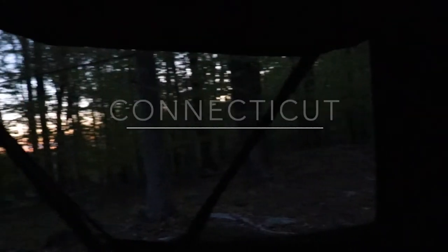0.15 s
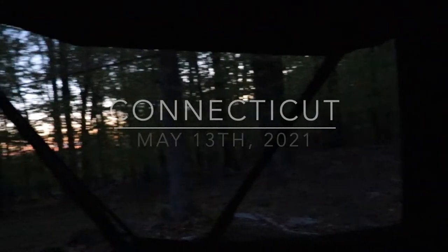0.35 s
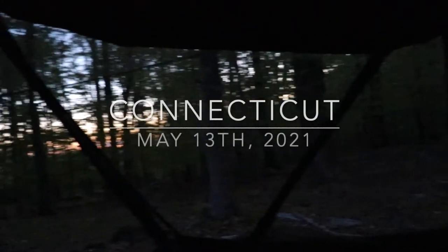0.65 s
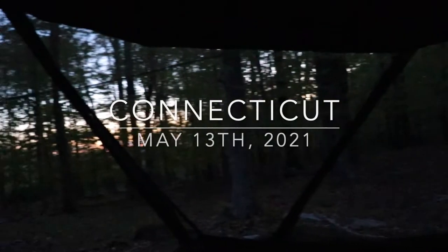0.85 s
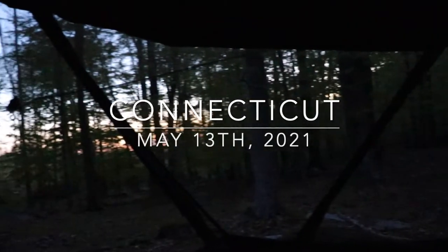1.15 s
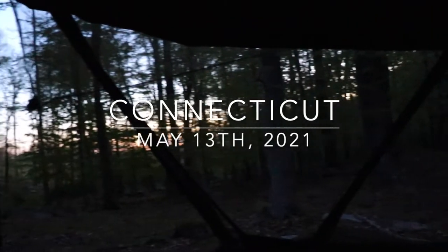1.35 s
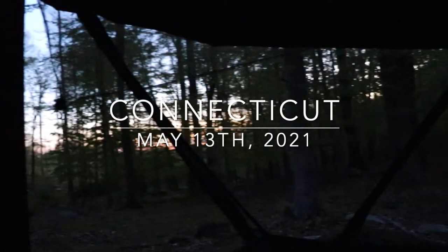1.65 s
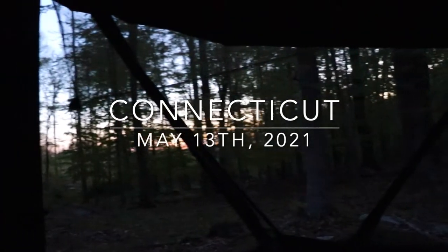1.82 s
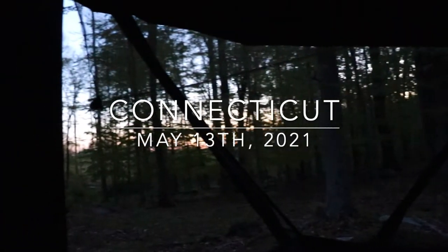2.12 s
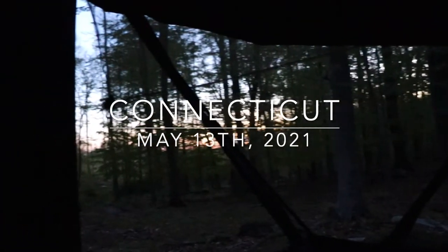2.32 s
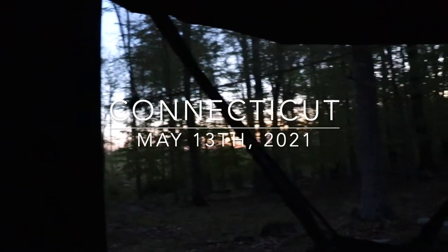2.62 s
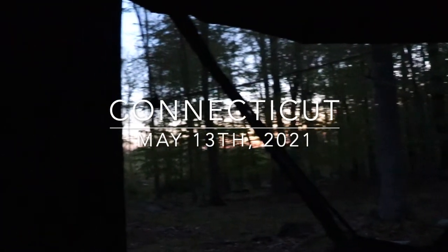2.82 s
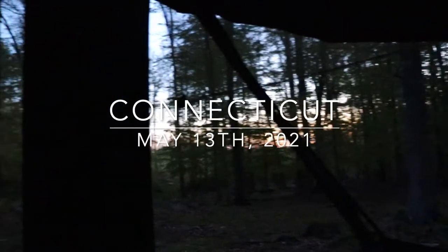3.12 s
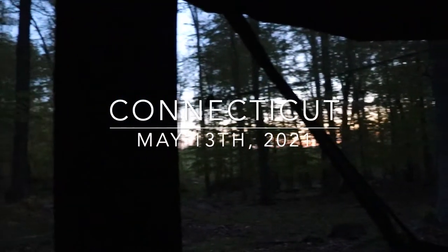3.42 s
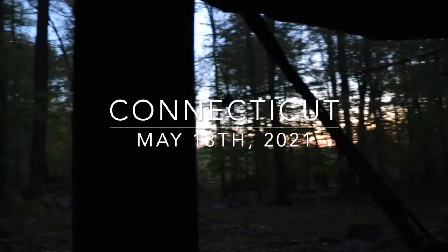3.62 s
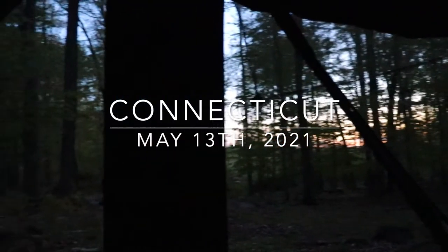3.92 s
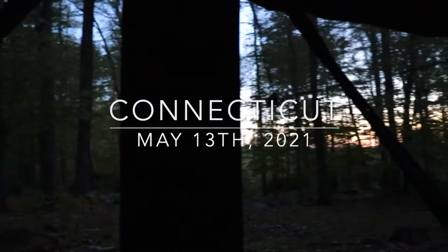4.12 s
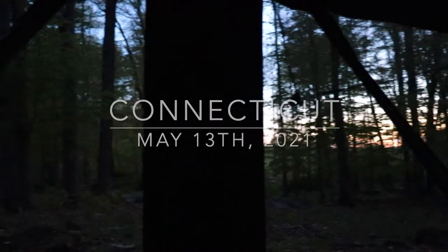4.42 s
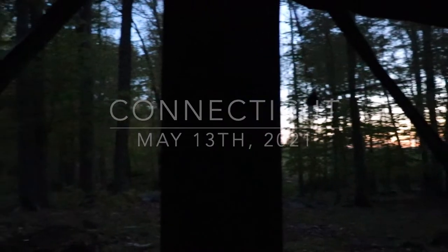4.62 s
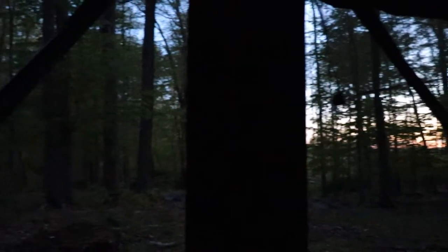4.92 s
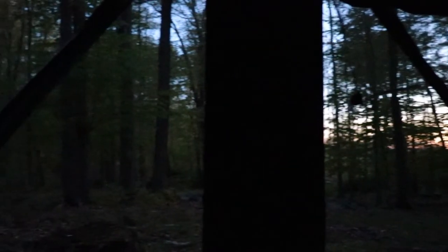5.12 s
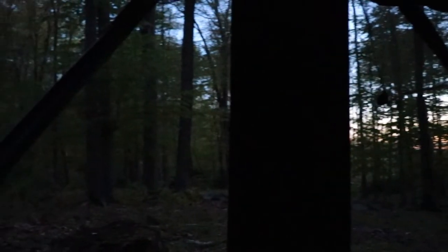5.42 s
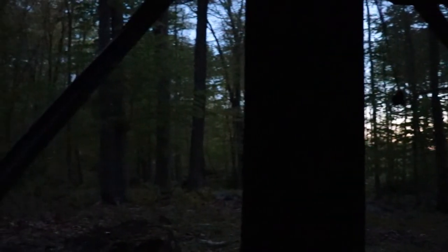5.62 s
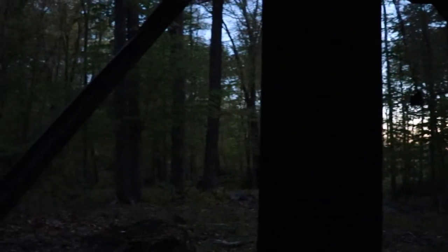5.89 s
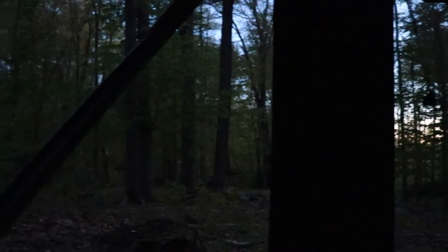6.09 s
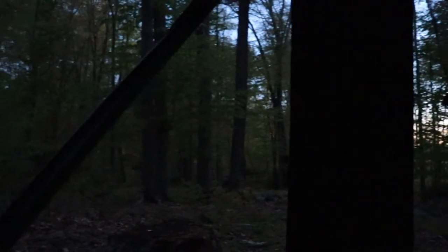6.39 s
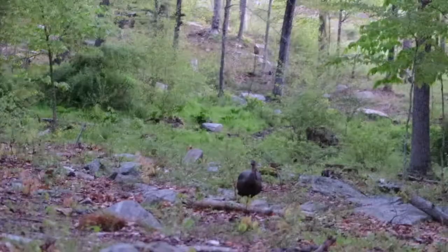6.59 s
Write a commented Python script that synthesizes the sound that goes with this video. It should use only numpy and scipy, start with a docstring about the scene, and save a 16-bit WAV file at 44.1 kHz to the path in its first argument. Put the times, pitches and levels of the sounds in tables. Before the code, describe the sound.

Quiet forest dawn chorus with short chirps, buzzes and echoes; someone shifts close by with rustling, small ticks, dull bumps and a single sharp click.

```python
"""A still wood at dawn: songbirds whistle, slur and buzz as gliding near-sines,
and the trunks scatter each note into a short tail of noise echoes.
Under them lie a hiss, a far drone and a faint low rumble, all coloured noise.
Someone turning nearby rustles and scuffs in bursts of noise, with small ticks and dull bumps.
Something snaps once close by, probably a twig: a run of cracks into resonances. Practically mono."""
import sys
import numpy as np
from scipy import signal
from scipy.fft import rfft, irfft
from scipy.io import wavfile
from scipy.ndimage import uniform_filter1d

SR = 44100
rng = np.random.default_rng(int(sys.argv[2]) if len(sys.argv) > 2 else 0)


def int16_out(signal):
    """Quantize to a 16-bit WAV file."""
    q = np.round(np.clip(np.atleast_2d(signal).T, -1, 1) * 32767)
    wavfile.write(sys.argv[1], SR, q.astype(np.int16))


N = 297675
TIME = np.arange(N) / SR


def undb(db):
    """Decibels to amplitude gain."""
    return 10 ** (np.asarray(db) / 20)


def unit(x):
    """Scale to rms 1."""
    return x / np.sqrt(np.mean(x ** 2))


def curve(rows):
    """Join (start_s, level_db) points by straight lines in time."""
    start_s, level_db = np.transpose(rows)
    return np.interp(TIME, start_s, level_db)


def add(out, start_s, x):
    """Mix a sound in at start_s."""
    i = max(0, int(start_s * SR))
    out[i:i + len(x)] += x[:max(0, N - i)]


def colour(x, spectrum):
    """Filter by (hz, density_db) points on a log frequency axis; white noise keeps its level."""
    hz, density_db = np.transpose(spectrum)
    f = np.fft.rfftfreq(len(x), 1 / SR)
    gain = unit(undb(np.interp(np.log(f + 1), np.log(hz), density_db)))
    return irfft(rfft(x) * gain, len(x))


def noise(spectrum):
    """Coloured noise of rms 1."""
    return unit(colour(rng.standard_normal(N), spectrum))


def resonate(x, hz, width_hz):
    """One resonance, gain 1 at the centre."""
    b, a = signal.iirpeak(hz, hz / width_hz, fs=SR)
    return signal.lfilter(b, a, x)


def walk(rate_hz):
    """Smoothed random steps, rate_hz per second, spread near 1."""
    k = int(SR / rate_hz)
    steps = np.repeat(rng.standard_normal(N // k + 1), k)
    return 1.194 * uniform_filter1d(steps, k)[:N]


# hiss spectrum: hz [Hz], density_db [dB per Hz, relative]
AIR_SPECTRUM = [(45, 9), (120, 2.5), (220, 2), (350, -0.5), (700, 1.5), (1100, -2.5), (1700, -3.5),
                (2700, -3.5), (3800, -10), (6000, -13), (15500, -17.5)]


def air():
    """Hiss of the air: broadband noise whose level wanders slightly."""
    return noise(AIR_SPECTRUM) * undb(-51.0 + 0.48 * walk(2.8))


# drone spectrum: hz [Hz], density_db [dB per Hz, relative]
DRONE_SPECTRUM = [(35, -12), (50, 4.5), (62, 3), (85, -7.5), (118, -2), (132, -4), (150, -3), (200, -12),
                  (300, -18), (700, -41.5)]
# drone level: start_s [s], level_db [dB rms]
DRONE_LEVEL = [(0, -51.5), (1.3, -55.5), (2.7, -52.5), (4, -54), (4.5, -59), (5.1, -56.5), (5.8, -61),
               (6.3, -56), (6.75, -49.5)]


def drone():
    """Far-off drone, probably traffic: low noise that rises and falls."""
    return noise(DRONE_SPECTRUM) * undb(curve(DRONE_LEVEL))


# rumble spectrum: hz [Hz], density_db [dB per Hz, relative]
RUMBLE_SPECTRUM = [(8, -16), (20, -11), (26, -1.5), (29, 0.5), (35, -12.5), (45, -25), (90, -48.5),
                   (300, -82)]
# rumble level: start_s [s], level_db [dB rms]
RUMBLE_LEVEL = [(0, -46), (.55, -50), (1.5, -49), (1.75, -45), (2.2, -45.5), (3.4, -46.5), (3.68, -39.5),
                (3.87, -48), (4.1, -41.5), (4.32, -50.5), (5.1, -41), (5.85, -42.5), (5.98, -57),
                (6.11, -43.5), (6.55, -47), (6.7, -38)]


def rumble():
    """Heaving rumble: very low noise, levelled over 1/8 s so that it follows the table."""
    rough = noise(RUMBLE_SPECTRUM)
    level = rough / np.sqrt(uniform_filter1d(rough ** 2, size=SR // 8))
    return level * undb(curve(RUMBLE_LEVEL))


def background():
    """Hiss, drone and rumble together."""
    return air() + drone() + rumble()


SETTLE, SWOOP_TOP = .27, .78  # shares of note length: a scoop settles, a swoop turns over
# bird gestures by name: progress from first to second pitch for u in 0..1, loudest [share of length]
GESTURES = {"slur": (lambda u: u, 0.45), "scoop": (lambda u: 1 - np.exp(-u / SETTLE), 0.65),
            "arch": (lambda u: np.sin(np.pi * u), 0.55),
            "lean": (lambda u: np.interp(u, [0, .2, .45, .78, 1], [0.021, .65, .97, 1, 0.26]), 0.8),
            "swoop": (lambda u: np.interp(u, [0, SWOOP_TOP / 2, SWOOP_TOP, 1], [0, .3, 1, -.25]), 0.93)}


def sing(notes, flutter_hz, flutter, waver, overtone_db, flicker_db):
    """Each note is a near sine that follows its gesture between two pitches while it swells and fades."""
    out = np.zeros(N)
    tremor = np.sin(2 * np.pi * np.cumsum(flutter_hz * (1 + 0.0994 * walk(30))) / SR)
    bend = 1 + flutter * tremor + waver * walk(180)
    for start_s, length_s, gesture, first_hz, second_hz, level_db in notes:
        u = np.linspace(0, 1, int(length_s * SR))
        contour, loudest = GESTURES[gesture]
        glide_hz = first_hz + (second_hz - first_hz) * contour(u)
        pitch_hz = glide_hz * np.interp(start_s + u * length_s, TIME, bend)
        phase = 2 * np.pi * np.cumsum(pitch_hz) / SR
        swell = np.abs(np.sin(np.pi * np.interp(u, [0, loudest, 1], [0, .5, 1]))) ** .75
        tone = np.sin(phase) + undb(overtone_db) * np.sin(2 * phase)
        add(out, start_s, undb(level_db) * swell * tone)
    # paths through the foliage interfere, so a gliding note flickers
    return out * undb(flicker_db * walk(140))


def wood(x, t60_s, early_db, early_s):
    """Trunks throw back a quick cluster of echoes, then the whole wood answers in a diffuse tail."""
    t = TIME[:2 * SR]
    hits = rng.random(len(t)) < 600 / SR  # 600 echoes per second
    trunks = rng.standard_normal(len(t)) * hits * np.exp(-t / early_s)
    decay = np.exp(-np.log(1000) * t / t60_s)
    tail = rng.standard_normal(len(t)) * decay * (1 - np.exp(-t / 0.007))
    response = (unit(tail) + undb(early_db) * unit(trunks)) / np.sqrt(len(t))
    return signal.fftconvolve(x, response)[:N]


def distant_song(per_s, low_hz, high_hz, length_s, slide):
    """Many faint slurs at random times and pitches."""
    count = int(per_s * N / SR)
    when, pitch, long, glide, loud = rng.random((count, 5)).T
    first_hz = low_hz * (high_hz / low_hz) ** pitch
    second_hz = first_hz * (1 + slide * (glide - .5))
    notes = zip(when * N / SR, length_s * (.5 + long), ["slur"] * count, first_hz, second_hz, -7 * loud)
    return sing(notes, flutter_hz=54.63, flutter=0.01, waver=0.0095, overtone_db=-42, flicker_db=3.0)


# wash spectrum: hz [Hz], density_db [dB per Hz, relative]
CHORUS_SPECTRUM = [(1200, -40), (1900, -13), (2300, -2), (2800, -3.5), (3400, -5), (4000, -6), (4600, -6),
                   (5400, -11), (7000, -31)]
# wash level before the mix gain: start_s [s], level_db [dB]
CHORUS_LEVEL = [(0, -56), (.6, -60), (1.2, -57), (1.8, -56), (2.4, -64), (3, -56), (3.5, -50.5), (4.2, -62),
                (4.7, -61), (5.3, -55.5), (6.75, -52.5)]


def chorus_wash():
    """Distant birds blur into a wash: random slurs, scattered by the wood and coloured."""
    song = distant_song(per_s=100, low_hz=1847, high_hz=5467, length_s=.07, slide=.3)
    crowd = wood(song, t60_s=1.3, early_db=0.0, early_s=0.021)
    return unit(colour(crowd, CHORUS_SPECTRUM)) * undb(curve(CHORUS_LEVEL) - 1.5)


FAR_RISE = 0.0865  # upward slide, share of pitch
# notes from deep in the wood: start_s [s], length_s [s], pitch_hz [Hz], level_db [dB before mix gain]
FAR_WHISTLES = [(0, 0.05, 4040, -53), (.484, 0.048, 2790, -50), (0.859, 0.075, 4560, -52),
                (.889, 0.044, 2300, -56), (0.98, .11, 2620, -58), (1.1, .125, 2307, -54),
                (1.127, 0.064, 4620, -51.5), (1.255, .1, 4740, -58), (1.318, .045, 2000, -54),
                (1.356, .11, 2290, -52), (1.396, .062, 4600, -58.5), (2.416, .14, 6560, -51),
                (3.927, .033, 2720, -51), (5.272, .069, 4410, -52), (5.36, .082, 2880, -62),
                (6.17, .07, 3750, -55), (6.491, 0.13, 3960, -53)]


def far_whistles():
    """Far singers: near-sines that all slide up through their pitch."""
    rising = []
    for start_s, length_s, pitch_hz, level_db in FAR_WHISTLES:
        first_hz, second_hz = pitch_hz * (1 - FAR_RISE / 2), pitch_hz * (1 + FAR_RISE / 2)
        rising.append((start_s, length_s, "slur", first_hz, second_hz, level_db))
    return sing(rising, flutter_hz=60, flutter=0.009, waver=0.0069, overtone_db=-40, flicker_db=3.0)


# fluttered notes: start_s [s], length_s [s], gesture, first_hz [Hz], second_hz [Hz],
# level_db [dB before mix gain]
BUZZES = [(.02, .16, "slur", 4900, 4750, -58.5), (.195, .079, "arch", 3900, 4070, -54.5),
          (.84, .14, "slur", 4700, 4600, -57), (1.694, .058, "scoop", 2730, 2850, -50),
          (1.9, .29, "slur", 2870, 2755, -51.5), (2.88, .06, "slur", 5470, 5860, -44.5),
          (3.595, .074, "slur", 3650, 2944, -46.5), (3.615, .11, "scoop", 6900, 5630, -47),
          (3.72, .074, "slur", 5050, 4480, -53), (4.925, .025, "slur", 2700, 3820, -49),
          (4.992, 0.035, "slur", 2600, 4300, -49.5), (4.995, .035, "slur", 5400, 5800, -54),
          (5.086, .05, "slur", 5200, 4600, -50), (5.432, .032, "slur", 4750, 4300, -52),
          (5.94, .044, "slur", 4800, 4100, -49), (6.02, .115, "slur", 1142, 1210, -53),
          (6.39, .062, "arch", 5150, 5700, -57), (6.42, .069, "slur", 4600, 4440, -51),
          (6.627, 0.051, "slur", 2800, 3006, -39), (6.665, .09, "slur", 3050, 2680, -45.5)]


def buzzes():
    """Buzzing notes: a fast, wide pitch flutter roughens the tone."""
    return sing(BUZZES, flutter_hz=85, flutter=0.045, waver=0.0156, overtone_db=-32, flicker_db=2.5)


# clear nearer notes: start_s [s], length_s [s], gesture, first_hz [Hz], second_hz [Hz],
# level_db [dB before mix gain]
WHISTLES = [(.052, .042, "slur", 2790, 2510, -44.5), (.106, 0.041, "scoop", 3430, 2920, -40),
            (.695, 0.059, "slur", 3660, 3360, -50.5), (.814, 0.061, "slur", 5200, 4500, -52),
            (1.493, .024, "slur", 3280, 3920, -48), (1.515, .07, "slur", 3680, 2895, -42.5),
            (1.642, 0.041, "arch", 2560, 2623, -42.5), (1.766, 0.031, "scoop", 2560, 2760, -46),
            (1.865, .06, "slur", 2926, 2820, -43.5), (1.92, .078, "slur", 2760, 2885, -45),
            (1.981, 0.095, "scoop", 2850, 2593, -47), (2.305, 0.12, "slur", 6880, 6260, -47),
            (2.588, 0.068, "scoop", 5500, 4320, -44.5), (2.636, .072, "scoop", 4320, 4160, -36.5),
            (3.895, .035, "arch", 1790, 2030, -48.5), (4.408, 0.036, "arch", 1770, 2020, -51.5),
            (4.575, 0.1, "slur", 2323, 1760, -45), (4.65, 0.07, "slur", 3520, 2580, -52),
            (4.712, .085, "slur", 2596, 2648, -45), (4.817, .045, "slur", 4260, 3200, -54),
            (4.896, .05, "slur", 4450, 3350, -52), (4.91, .04, "slur", 2140, 3650, -49),
            (4.911, 0.039, "scoop", 4980, 5470, -43.5), (5.02, 0.036, "slur", 4030, 4380, -48),
            (5.095, .025, "scoop", 2350, 3146, -46), (5.232, .05, "slur", 2620, 2590, -49),
            (5.3, .052, "slur", 3570, 3710, -47), (5.351, 0.036, "arch", 1685, 2010, -45.5),
            (5.39, .047, "slur", 6040, 5000, -59), (5.621, 0.033, "slur", 4100, 4850, -53),
            (5.755, .04, "scoop", 4700, 3980, -48.5), (5.8, 0.049, "scoop", 4040, 4660, -50),
            (5.892, .031, "scoop", 5200, 5800, -55), (5.945, .138, "swoop", 1853, 3120, -43),
            (6.12, .12, "scoop", 1400, 1960, -44.5), (6.128, .025, "scoop", 4000, 4610, -50),
            (6.264, 0.026, "slur", 4350, 4090, -47.5), (6.304, 0.052, "slur", 4720, 4380, -40),
            (6.335, .07, "slur", 4300, 4160, -43), (6.369, 0.029, "scoop", 1910, 1720, -49),
            (6.485, .033, "slur", 4300, 2900, -50), (6.513, 0.076, "slur", 2720, 2700, -48.5)]


def whistles():
    """Clear notes of the nearer birds: almost pure tones with slight flutter."""
    return sing(WHISTLES, flutter_hz=90.8, flutter=0.0055, waver=0.003, overtone_db=-35, flicker_db=2.0)


PHRASE_HZ, PHRASE_RISE_HZ = 3000, 402  # pitch the phrase leans on and the climb to it
CHIP_GAP_S, CHIP_DB = .052, -45.5
# one singer's repeated phrase: start_s [s], length_s [s], level_db [dB before mix gain]
PHRASES = [(4.078, .082, -37.5), (5.533, .099, -39.5)]


def phrases():
    """The repeated phrase: climb to the pitch, lean on it, let go, drop in a quick chip with a strong overtone."""
    notes = []
    for start_s, length_s, level_db in PHRASES:
        chip_s = start_s + length_s + CHIP_GAP_S
        notes += [(start_s, length_s, "lean", PHRASE_HZ - PHRASE_RISE_HZ, PHRASE_HZ, level_db),
                  (chip_s, .023, "slur", 3850, 2550, CHIP_DB),
                  (chip_s + 0.0079, .012, "slur", 7000, 4400, CHIP_DB + 0.5)]
    return sing(notes, flutter_hz=91, flutter=.003, waver=0.0042, overtone_db=-17.0, flicker_db=1.8)


def birds():
    """Near and far singers in one wood, over the wash of the rest."""
    wash, far, buzz = chorus_wash(), far_whistles(), buzzes()
    near = whistles() + phrases()
    # the further the singer, the larger the share that arrives by way of the trunks
    sent = undb(-6.5) * near + undb(-5.0) * buzz + undb(-3.5) * far
    echoes = wood(sent, t60_s=1.0, early_db=-2.5, early_s=0.016)
    direct = undb(-1.24) * near + undb(-1.5) * buzz + undb(-2.0) * far
    return direct + echoes + wash


def catches(per_s, size_db, spread_db, decay_s):
    """Threads catch and let go at random: each lifts the level at once and dies away."""
    kicks = (rng.random(N) < per_s / SR) * undb(size_db + spread_db * rng.random(N))
    lift = signal.lfilter([1], [1, -np.exp(-1 / (decay_s * SR))], kicks)
    return unit(1 + lift)


RUSTLE_ATTACK_S, RUSTLE_RELEASE_S = 0.044, 0.053
RESTING_SCUFF_DB = -64  # the cloth is never quite still
# cloth spectra: hz [Hz], density_db [dB per Hz, relative]
SWISH_SPECTRUM = [(300, -26), (1500, -5), (3200, -4.5), (4500, 0.5), (6000, 0), (8000, -3), (10000, -8.5),
                  (12500, -8.5), (15500, -21)]
SCUFF_SPECTRUM = [(100, -4), (300, -1.5), (700, 1.5), (1150, 3), (1600, -4.5), (2500, -12), (4000, -7),
                  (8000, -33)]
# strokes as the body turns: start_s [s], length_s [s], swish_db [dB], scuff_db [dB], before flicker
RUSTLES = [(.21, .06, -61, -60), (1.8, 0.42, -59, -59.5), (2.216, 0.26, -61.5, -63), (2.56, .1, -54.5, -57),
           (2.659, 0.15, -45, -65), (2.836, 0.098, -45, -57), (3.053, 0.048, -48.5, -48),
           (3.132, .11, -53.5, -53), (3.28, .18, -52.5, -57), (3.49, 0.19, -64, -57),
           (3.689, 0.11, -51.5, -54), (3.847, .14, -49.5, -54), (4.002, 0.11, -57, -52),
           (4.13, 0.11, -62, -53), (4.308, 0.17, -70, -59), (6.001, .14, -57, -51),
           (6.213, .06, -47.5, -53), (6.333, .17, -59.5, -53.5), (6.54, .15, -68, -53.5),
           (6.694, 0.044, -52, -53)]


def clothing():
    """Fabric slides in tiny slips: strokes build, hold and die away, a bright swish and a duller scuff."""
    swish_power, scuff_power = 0, undb(RESTING_SCUFF_DB) ** 2
    for start_s, length_s, swish_db, scuff_db in RUSTLES:
        attack = np.clip((TIME - start_s) / RUSTLE_ATTACK_S, 0, 1)
        release = np.exp(-np.maximum(TIME - start_s - length_s, 0) / RUSTLE_RELEASE_S)
        stroke = attack * release
        swish_power = swish_power + (stroke * undb(swish_db)) ** 2
        scuff_power = scuff_power + (stroke * undb(scuff_db)) ** 2
    swish = noise(SWISH_SPECTRUM) * np.sqrt(swish_power) * undb(0.3 + 0.61 * walk(300))
    swish = swish * catches(per_s=45, size_db=-12, spread_db=10.5, decay_s=.005)
    scuff = noise(SCUFF_SPECTRUM) * np.sqrt(scuff_power) * undb(2.8 * walk(120))
    return swish + scuff


def knocks(rows, width, rise_s):
    """Short noisy contacts, each dying away in one broad resonance; width is a share of its centre."""
    out, t = np.zeros(N), TIME[:SR // 2]
    for start_s, level_db, centre_hz, decay_s in rows:
        body = rng.standard_normal(len(t))
        for _ in range(2):  # two passes steepen the skirts
            body = unit(resonate(body, centre_hz, width * centre_hz))
        envelope = np.exp(-t / decay_s) * (1 - np.exp(-t / rise_s))
        add(out, start_s, undb(level_db) * body * envelope)
    return out


# dull handling bumps: start_s [s], level_db [dB before envelope], centre_hz [Hz], decay_s [s]
BUMPS = [(.25, -49, 190, .04), (.549, -51, 174, 0.045), (3.012, -38, 500, 0.013), (3.168, -37, 560, 0.015),
         (3.96, -43.5, 89, 0.057), (6.475, -44, 800, .012), (6.578, -31.5, 241, 0.014),
         (6.672, -41, 229, 0.019), (6.706, -31.5, 106, 0.12), (6.715, -45, 260, .08)]


def bumps():
    """Dull bumps of handling: slow-rising contacts, mostly low."""
    return knocks(BUMPS, width=0.48, rise_s=0.015)


# small dry ticks: start_s [s], level_db [dB before envelope], centre_hz [Hz], decay_s [s]
TICKS = [(.672, -49, 4970, .009), (1.335, -54, 7000, .008), (1.992, -41.5, 1900, .008),
         (1.993, -44, 5000, .0065), (2.018, -52, 8000, .005), (2.383, -45, 7000, .004),
         (3.082, -38.5, 1830, 0.01), (3.108, -38.5, 3770, .007), (3.127, -44.5, 7450, .008),
         (3.768, -45, 3980, .01), (6.35, -48, 5500, .008), (6.603, -50, 7000, .005)]


def ticks():
    """Dry ticks of cloth and litter: abrupt, bright, broad contacts."""
    return knocks(TICKS, width=0.84, rise_s=0.00032)


SNAP_S, SNAP_DB = 3.2615, -21  # main break, level before filtering
FIBRE_GAP_S, SNAP_BUILD_DB_PER_S, SNAP_FADE_DB_PER_S = .0021, 2000, 1250
# crack spectrum: hz [Hz], density_db [dB per Hz, relative]
CRACK_SPECTRUM = [(150, -24), (400, 3), (1500, 3), (3000, -2.5), (5000, 5), (6500, 1), (8000, -6),
                  (12500, -9), (15000, -22)]
# ring of the twig: hz [Hz], width_hz [Hz], level_db [dB, relative]
TWIG_RING = [(476, 110, -5), (1640, 55, 5), (2150, 50, -1), (3100, 140, 3), (4480, 80, -5), (4900, 70, -5),
             (5400, 70, -22), (6240, 80, 0)]


def twig(crack_s=0.0011, tail_s=0.013, tail_db=-12, ring_db=4, count=9):
    """A quick run of fractures that builds to the main break and fades, each crack ringing the wood."""
    cracks, t = np.zeros(N), TIME[:SR // 10]
    envelope = np.exp(-t / crack_s) + undb(tail_db) * np.exp(-t / tail_s)
    # fibres give way before and after the main break
    delays_s = FIBRE_GAP_S * (np.arange(count) - 2 + .15 * rng.standard_normal(count))
    for delay_s in delays_s:
        level_db = SNAP_DB + min(SNAP_BUILD_DB_PER_S * delay_s, -SNAP_FADE_DB_PER_S * delay_s)
        splinters = rng.choice([-1, 1], len(t))
        add(cracks, SNAP_S + delay_s, undb(level_db) * splinters * envelope)
    ring = sum(undb(level_db) * resonate(cracks, hz, width_hz) for hz, width_hz, level_db in TWIG_RING)
    return undb(-4) * colour(cracks, CRACK_SPECTRUM) + undb(ring_db) * ring


def scene():
    """Everything sits in the middle; only a trace of low noise differs between the sides."""
    mid = background() + birds() + clothing() + bumps() + ticks() + twig()
    side = undb(-78.5) * noise([(30, -7.5), (250, -3.0), (600, -9.0), (1200, -49.5)])
    return np.array([mid + side, mid - side])


TOP_HZ = 15800


def record(dry):
    """Steep elliptic low-pass: almost nothing passes above TOP_HZ."""
    low_pass = signal.ellip(10, .1, 80, TOP_HZ, fs=SR, output="sos")  # ripple, stopband in dB
    return signal.sosfilt(low_pass, dry)


dry = scene()
out = record(dry)
int16_out(out)
```